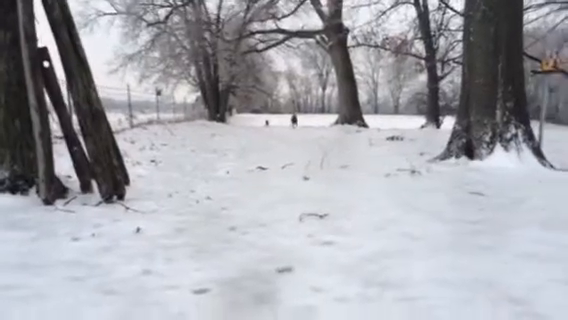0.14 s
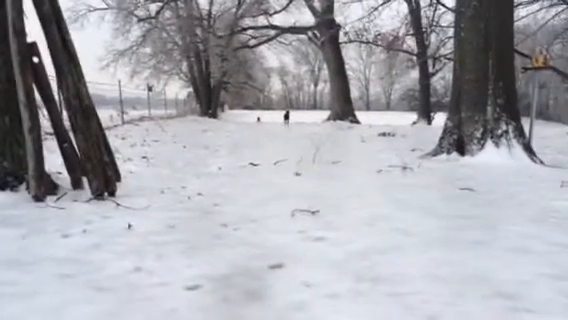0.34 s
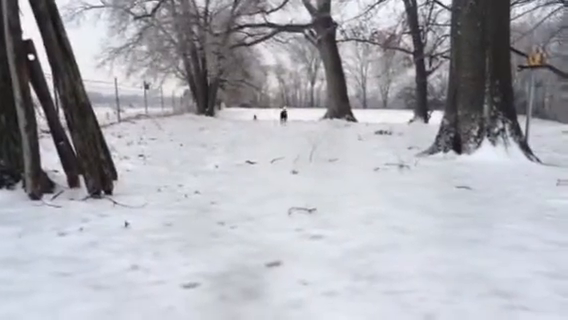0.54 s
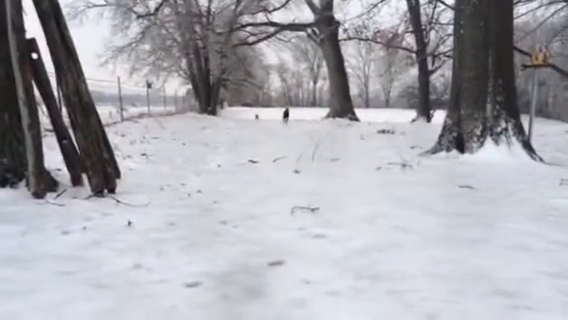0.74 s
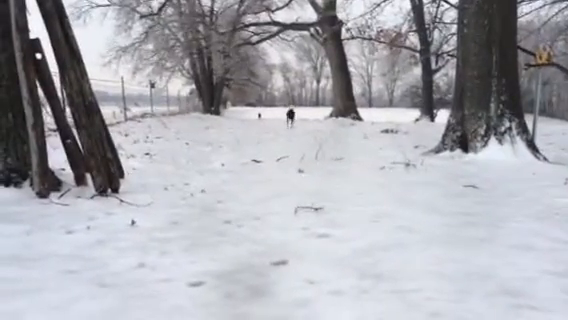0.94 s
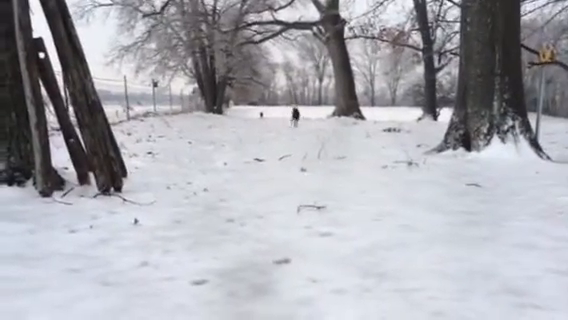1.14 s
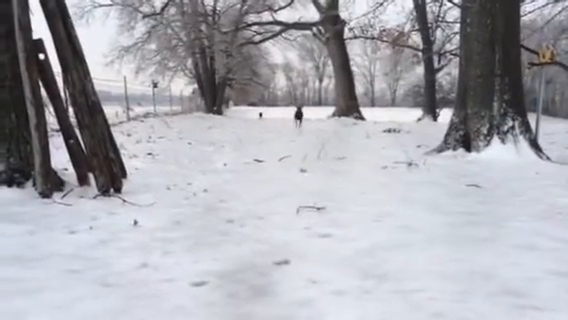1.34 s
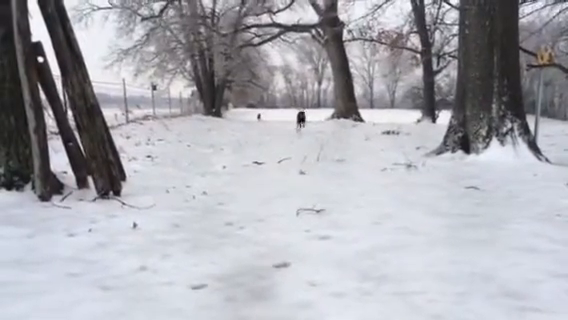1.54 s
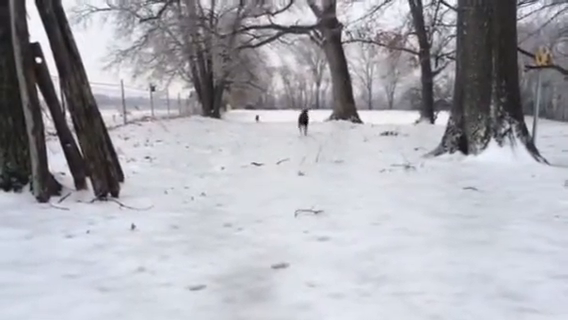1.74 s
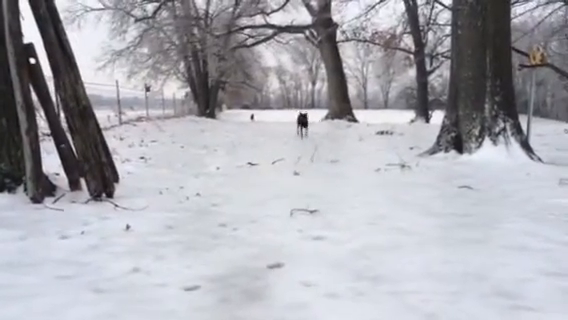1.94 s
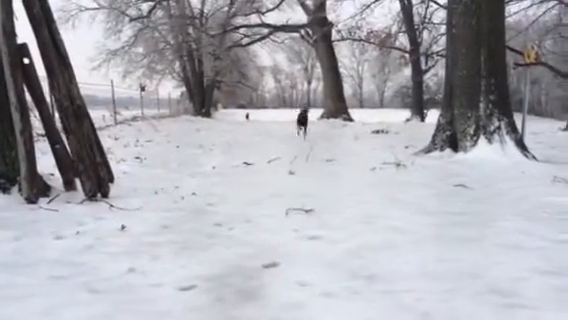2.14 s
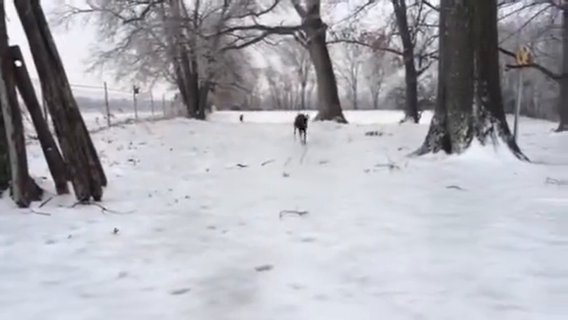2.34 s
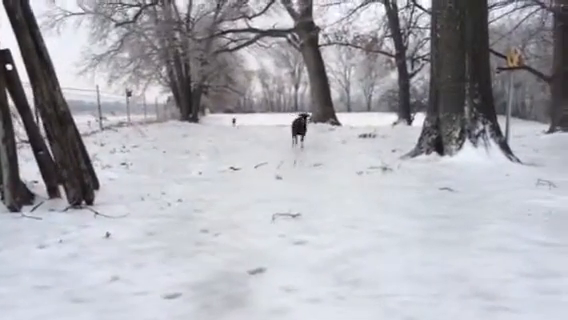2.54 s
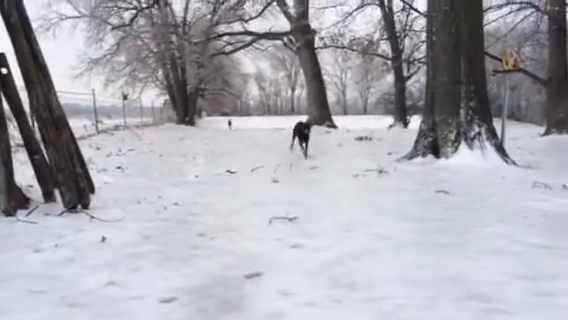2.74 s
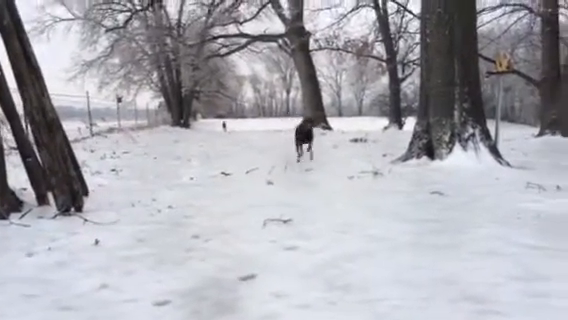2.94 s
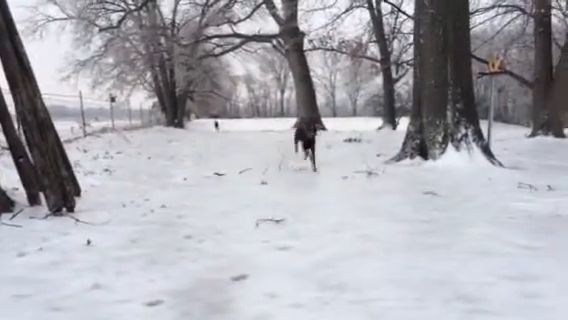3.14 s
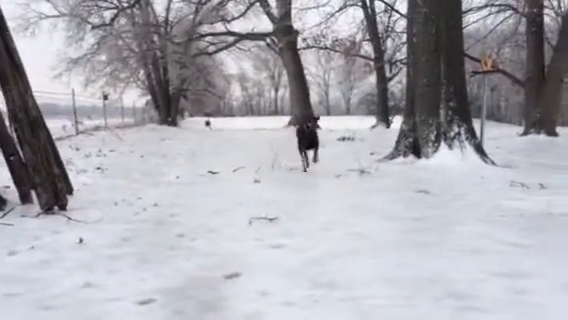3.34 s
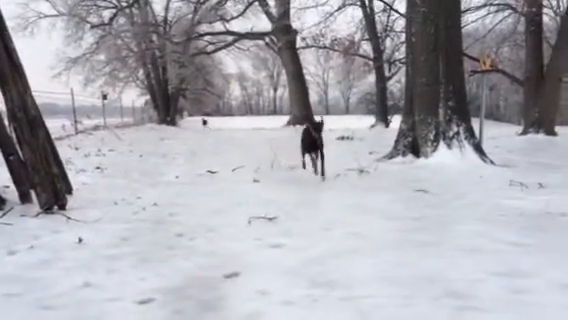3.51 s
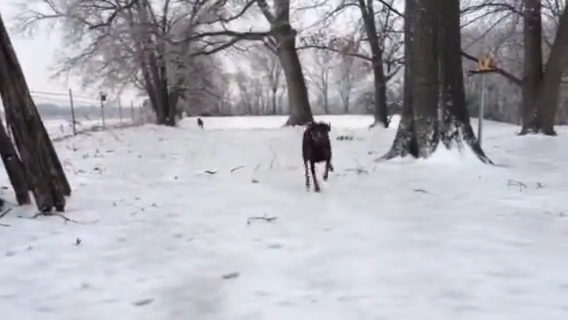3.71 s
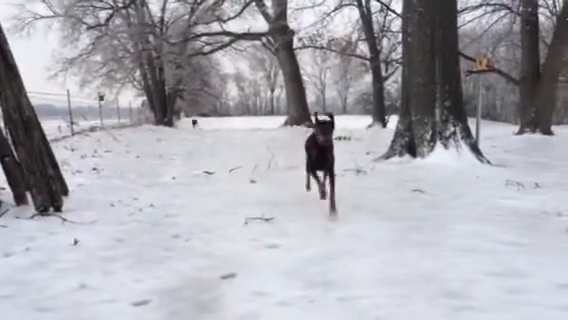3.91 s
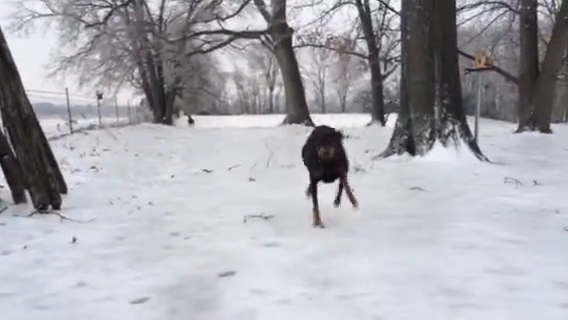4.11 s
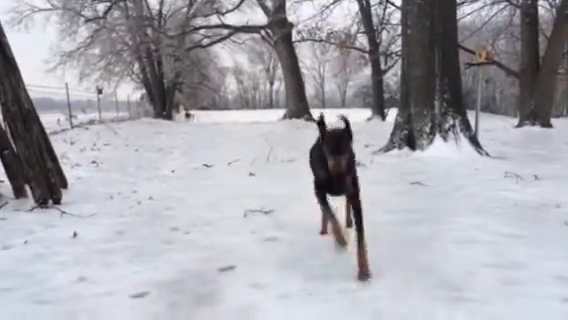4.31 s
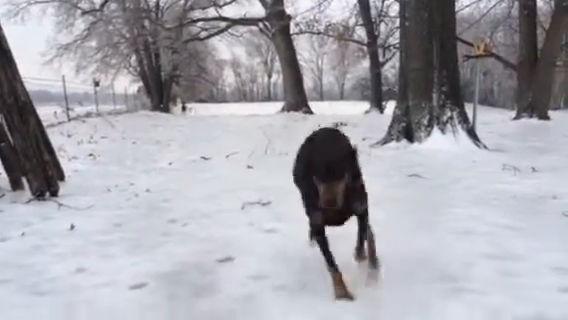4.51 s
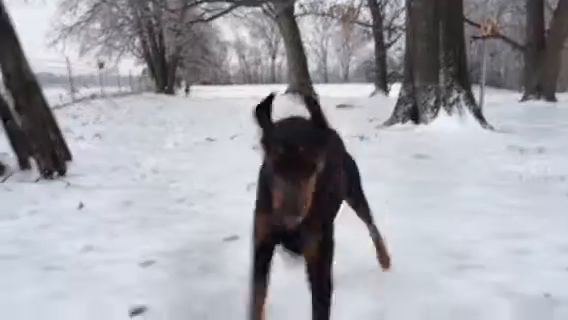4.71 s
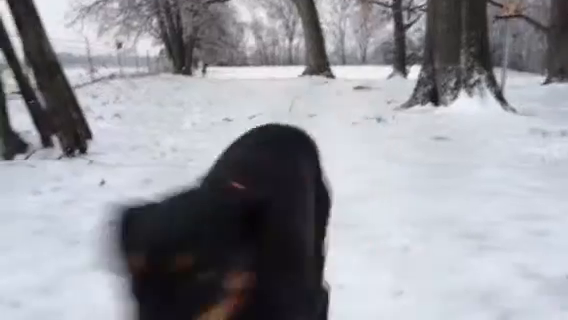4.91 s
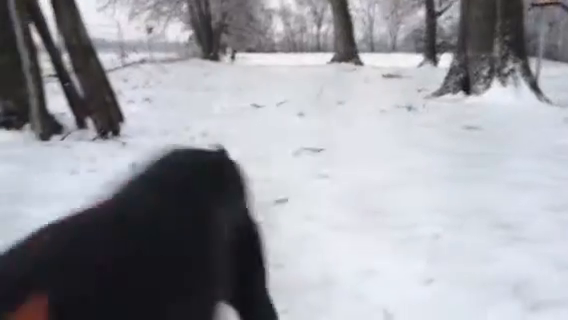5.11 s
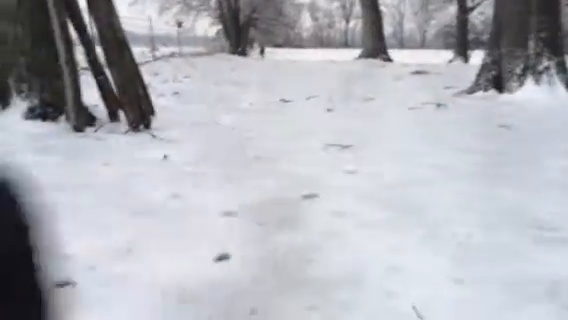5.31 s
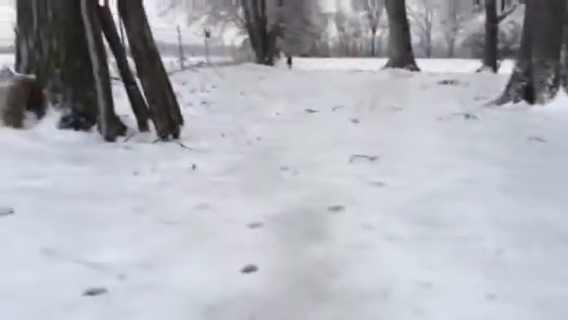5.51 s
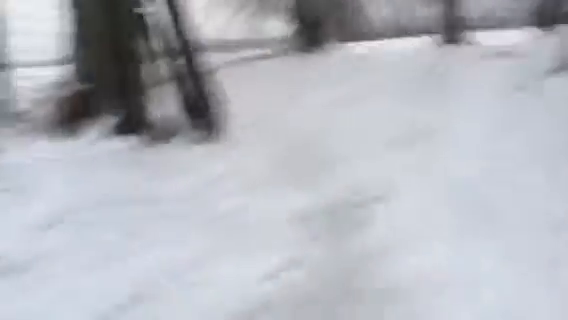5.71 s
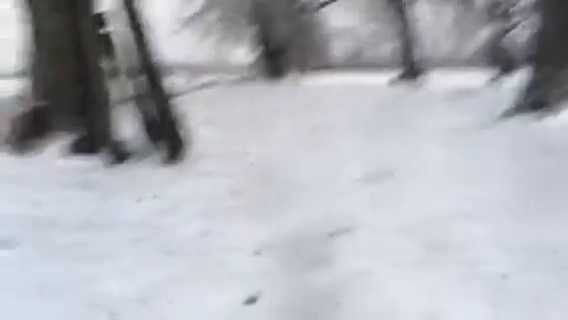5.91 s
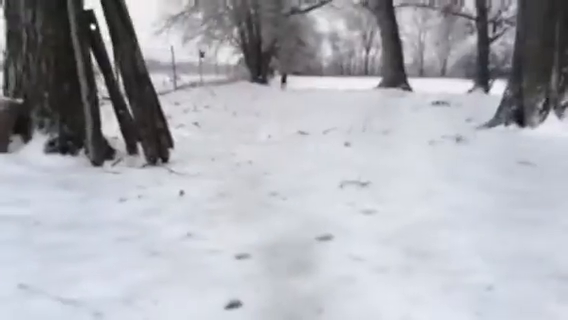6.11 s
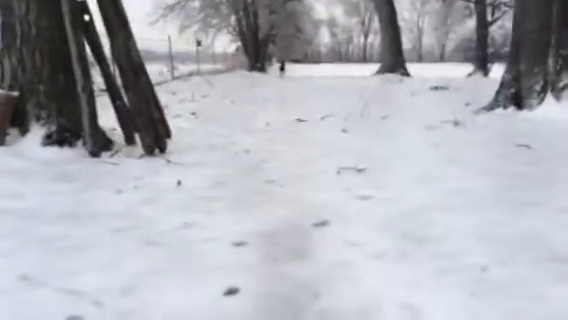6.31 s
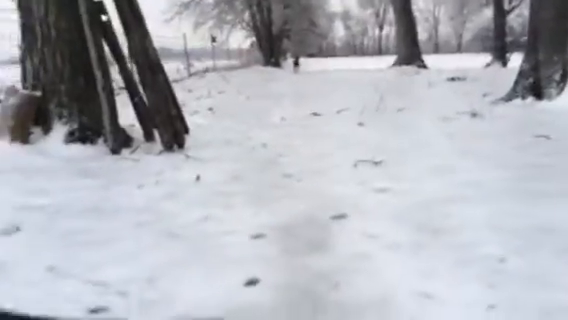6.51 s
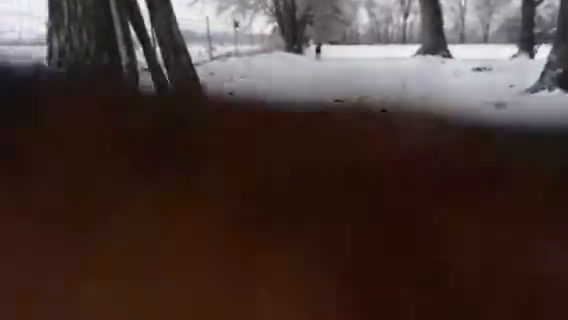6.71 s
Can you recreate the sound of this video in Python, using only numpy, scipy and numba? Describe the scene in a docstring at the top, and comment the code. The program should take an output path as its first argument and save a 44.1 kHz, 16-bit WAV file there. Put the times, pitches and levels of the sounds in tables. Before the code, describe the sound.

Quick paired paw falls start far away and faint over a soft hush, each a grainy crunch of snow crust. They approach, gaining glassy snaps and soft thuds, and peak sharply as the dog passes very near the microphone. Scrambling skids and scattering ice crumbs follow, thinning out before a close airy dog huff and a last few scuffs. Open, nearly dry woodland with faint short reflections from trunks.

```python
"""A dog gallops towards a phone over ice-crusted snow between trees, passes close, skids about and huffs.
Each paw crushes the crust into a spray of band-ringing grains, thumps the packed snow (sagging sines
over rough noise) and snaps single ice plates (noise tick and damped sine); crumbs trickle and skids scrape.
Light wind and the nearest steps push low noise puffs onto the microphone over a faint breeze and a faint
winter hush of steady noise."""
import sys
import numpy as np
from scipy import signal
from scipy.fft import rfft, irfft
from scipy.io import wavfile
from scipy.ndimage import uniform_filter1d
from numba import njit

SR = 44100
rng = np.random.default_rng(int(sys.argv[2]) if len(sys.argv) > 2 else 0)


def invert_db(level):
    """Linear amplitude ratio for a level in decibels (20 dB per decade), elementwise."""
    return 10 ** (np.asarray(level, dtype=float) / 20)


def store_pcm(level_fs):
    """Save levels as 16-bit WAV."""
    pcm = np.round(np.clip(level_fs, -1, 1) * 32767).astype(np.int16)
    wavfile.write(sys.argv[1], SR, np.atleast_2d(pcm).T)


N = 297918
T = np.arange(N) / SR

# paw falls, with a few short skids and grit bursts:
# (time [s], nominal crunch level [dB], crush level re crunch [dB], rise [s], fade [s])
CRUNCHES = [(0.0553, -45.5, -8.5, 0.0044, 0.019), (0.1112, -46.5, -8, 0.0051, 0.013),
            (0.2335, -44.5, -11, 0.0032, 0.036), (0.275, -43.5, -8, 0.0042, 0.007),
            (0.415, -50, -12, 0.0083, 0.019), (0.4656, -47, -5.5, 0.012, 0.023),
            (0.5912, -45, -13, 0.0031, 0.029), (0.643, -47.5, -3.5, 0.0043, 0.013),
            (0.7763, -46.5, -10, 0.0092, 0.013), (0.85, -46, -9, 0.007, 0.016),
            (0.974, -43.5, -13, 0.006, 0.015), (1.012, -48.5, -4.5, 0.0061, 0.023),
            (1.1678, -44, -9, 0.0068, 0.01), (1.226, -43, -8, 0.005, 0.02),
            (1.3284, -44, -6.5, 0.0028, 0.019), (1.377, -40, -5.5, 0.014, 0.007),
            (1.522, -45, -8, 0.006, 0.012), (1.5892, -40, -4, 0.0095, 0.013),
            (1.7092, -37, -6.5, 0.0071, 0.015), (1.762, -36.5, -16, 0.0052, 0.017),
            (1.9025, -37.5, -13, 0.0098, 0.015), (1.98, -43, -13, 0.0059, 0.035),
            (2.084, -41, -15, 0.0035, 0.023), (2.1411, -47, -4.5, 0.0073, 0.021),
            (2.18, -45.5, -6.5, 0.014, 0.02), (2.289, -35, -17, 0.0057, 0.0081),
            (2.3538, -38.5, -4.5, 0.022, 0.0065), (2.4792, -38, -9, 0.0029, 0.022),
            (2.5409, -37.5, -5.5, 0.0031, 0.0071), (2.572, -37.5, -11.5, 0.013, 0.0084),
            (2.6828, -42, -3.5, 0.0039, 0.0056), (2.697, -41.5, -13, 0.017, 0.013),
            (2.7426, -38, -20, 0.0071, 0.018), (2.866, -33, -7.5, 0.011, 0.0082),
            (2.9317, -36.5, -15, 0.0035, 0.025), (3.078, -37.5, -10.5, 0.0053, 0.032),
            (3.141, -37.5, -8.5, 0.0069, 0.015), (3.285, -33.5, -3, 0.0042, 0.0089),
            (3.3468, -34.5, -5, 0.0083, 0.015), (3.4916, -37.5, -2, 0.0048, 0.012),
            (3.5663, -32, -6.5, 0.0064, 0.013), (3.6961, -32.5, -7, 0.0028, 0.024),
            (3.738, -32, -13.0, 0.0073, 0.028), (3.8904, -30, -12, 0.011, 0.012),
            (3.9647, -29, -6, 0.0064, 0.017), (4.0129, -53, 3, 0.004, 0.0083),
            (4.083, -26.5, -6, 0.0033, 0.019), (4.138, -24, -9, 0.006, 0.02),
            (4.2024, -54, -8, 0.022, 0.035), (4.322, -25, -6, 0.014, 0.015),
            (4.3663, -25, -15, 0.012, 0.016), (4.406, -24.5, -5.5, 0.0052, 0.0037),
            (4.4309, -49, -8.0, 0.008, 0.0046), (4.471, -18.5, -11, 0.0032, 0.009),
            (4.498, -32, -3.5, 0.017, 0.0057), (4.535, -23, -11, 0.0019, 0.0065),
            (4.598, -42, -9, 0.021, 0.089), (4.684, -22.5, -11, 0.017, 0.018),
            (4.738, -23, -19, 0.0086, 0.013), (4.7811, -30, -6, 0.0075, 0.0081),
            (4.838, -29.5, -23, 0.0051, 0.007), (4.861, -25, -5, 0.0034, 0.027),
            (4.929, -24, 0, 0.0034, 0.032), (5.0191, -44, -12, 0.0094, 0.0048),
            (5.0814, -22.5, -4, 0.0087, 0.033), (5.1556, -36, 5.5, 0.0098, 0.0036),
            (5.1794, -27, -1, 0.015, 0.0073), (5.2234, -21, -1, 0.0067, 0.018),
            (5.262, -35.5, -9, 0.034, 0.03), (5.295, -29, -3, 0.012, 0.03),
            (5.449, -29, -11.0, 0.0029, 0.0094), (5.4726, -39, -5, 0.007, 0.015),
            (5.509, -35.5, -10, 0.011, 0.011), (5.526, -28, 4.5, 0.017, 0.01),
            (5.5595, -29, 4.5, 0.0043, 0.0031), (5.578, -33.5, -1.5, 0.022, 0.023),
            (5.674, -24.5, 0.5, 0.01, 0.014), (5.702, -37, -6, 0.013, 0.013),
            (5.755, -39, -5, 0.022, 0.0064), (5.7993, -35, -16, 0.023, 0.012),
            (5.8396, -32, -6, 0.02, 0.0042), (5.8746, -39, -7, 0.01, 0.01),
            (5.9326, -20.5, -9, 0.0059, 0.0029), (5.9787, -37.5, 2, 0.0049, 0.011),
            (5.9954, -37.5, -22, 0.012, 0.032), (6.0457, -29, -0.5, 0.015, 0.0078),
            (6.0951, -41, -8, 0.015, 0.01), (6.4607, -33, -3, 0.047, 0.021)]
# spectrum of breaking crust and ice crumbs: (frequency [Hz], density [dB per Hz])
CRUST_SPECTRUM = [(880, -15), (1500, -11.5), (2560, -6.5), (4160, -6), (6240, -1.5), (7390, -1.5),
                  (9100, -4.5), (14600, -2.5), (15500, -27), (16000, -25)]


def unit(x):
    """Scale to rms 1."""
    return x / np.sqrt(np.mean(x ** 2))


def colour(x, points):
    """Filter by (Hz, dB) points with a minimum-phase response made from the folded cepstrum; rms 1."""
    hz, db = np.transpose(points)
    grid_hz = np.maximum(np.arange(2049) * SR / 4096, 1)
    gain_db = np.interp(np.log(grid_hz), np.log(hz), db, left=db[0] - 38.0, right=db[-1] - 15)
    cepstrum = irfft(gain_db * np.log(10) / 20)
    cepstrum[1:2048] *= 2
    cepstrum[2049:] = 0
    impulse = irfft(np.exp(rfft(cepstrum)))
    return unit(signal.fftconvolve(x, impulse)[:N])


def curve(table):
    """Interpolate the columns of a (s, value, ..) table at every sample."""
    s, *columns = np.transpose(table)
    return [np.interp(T, s, column) for column in columns]


def swells(table):
    """Bell-shaped gains, one per level column, from (s, dB, .., length s) rows."""
    gains = 0
    for s, *db, length_s in table:
        bell = np.exp(-((T - s) / (.5 * length_s)) ** 2)  # length between the 1/e points
        gains = gains + np.outer(invert_db(np.array(db)), bell)
    return gains


def walk(rate_hz):
    """Random levels joined by ramps of 1 / rate_hz; rms 1."""
    hold = int(SR / rate_hz)
    steps = np.repeat(rng.standard_normal(N // hold + 1), hold)
    return unit(uniform_filter1d(steps, hold)[:N])


@njit
def svf(x, hz, width_hz):
    """State-variable band-pass with a moving centre, gain 1 there."""
    y, band, low = np.empty(len(x)), 0., 0.
    for i in range(len(x)):
        g = np.tan(np.pi * hz[i] / SR)
        k = width_hz / hz[i]
        v = (band + g * (x[i] - low)) / (1 + g * (g + k))
        band = 2 * v - band
        low = low + 2 * g * v
        y[i] = k * v
    return y


def grains(rate_hz, spread_db, bed, flicker_db=2.0):
    """Breaking crystals of very uneven size over fine noise; each band rings and flickers on its own."""
    out = 0
    for hz in 150 * 2 ** np.arange(0, 6.8, .75):
        size_db = spread_db * np.minimum(rng.exponential(size=N), 3.5)
        hits = rng.random(N) < rate_hz / SR
        clicks = hits * rng.standard_normal(N) * invert_db(size_db)
        drive = unit(clicks) + bed * rng.standard_normal(N)
        band = svf(drive, np.full(N, hz), 0.65 * hz)
        out = out + invert_db(flicker_db * walk(50)) * band
    return out


def add(out, s, sound):
    """Mix a sound in at time s."""
    i = max(int(s * SR), 0)
    out[i:i + len(sound)] += sound[:N - i]


def hush():
    """Faint winter hush: steady coloured noise."""
    # (frequency [Hz], density [dB per Hz])
    spectrum = [(59, -31), (100, -9), (200, -10), (433, -15), (4110, -17.5), (6150, -20), (14700, -25),
                (16000, -35)]
    return invert_db(-66) * colour(rng.standard_normal(N), spectrum)


def wind():
    """Wind and the nearest steps push low, uneven puffs onto the microphone over a faint breeze."""
    # puffs from wind and the nearest steps: (mid time [s], nominal level [dB], length [s])
    puffs = [(.05, -56, 0.19), (.32, -48.5, 0.11), (.63, -47.5, 0.16), (1.02, -59, .08),
             (1.57, -42.5, 0.11), (2.36, -57, .15), (2.52, -55, 0.068), (2.95, -48, 0.077),
             (3.64, -38.5, 0.17), (4.1, -44, 0.063), (4.34, -51, 0.071), (4.51, -43, .15),
             (4.87, -27.5, 0.065), (5.1, -45, 0.092), (5.27, -46, 0.16), (5.62, -41, 0.22),
             (6.06, -41, 0.09)]
    # (frequency [Hz], density [dB per Hz])
    spectrum = [(20, -18), (35, -13), (58, -6.5), (90, -12.5), (160, -23.5), (300, -42)]
    breeze_db = -63
    flutter_db = 1.5 * walk(25)
    gain = invert_db(breeze_db) + swells(puffs)[0]
    return colour(rng.standard_normal(N), spectrum) * invert_db(flutter_db) * gain


def trickle():
    """Scattered ice crumbs skitter on; paws and body scrape the snow, swelling in the skids."""
    # loose ice around the dog: (time [s], nominal crumb level [dB], nominal low scrape level [dB])
    loose_ice = [(0, -70, -68.5), (.9, -65, -69.5), (1.2, -60, -62.5), (2.2, -60, -63.5), (2.8, -56.5, -65),
                 (3.1, -60.5, -64.5), (4.05, -60.5, -65.5), (4.45, -54, -56), (4.65, -43.5, -50.5),
                 (5.36, -61, -58), (5.41, -56.5, -60), (5.9, -49, -54.5), (6.1, -53.5, -50),
                 (6.76, -53, -55.5)]
    # skids that plough the snow: (mid time [s], nominal crumb level [dB], nominal scrape level [dB], length [s])
    skids = [(4.4, -50, -41, 0.048), (4.57, -38.5, -49, 0.086), (4.77, -40, -45.5, .1),
             (4.9, -37.5, -45, 0.078), (5.02, -46, -48, 0.2), (5.19, -42, -37, 0.067),
             (5.28, -32.5, -36.5, 0.11), (5.36, -39.5, -40.5, 0.075), (5.6, -42.5, -36.5, .16),
             (5.72, -38.5, -38.5, 0.088), (5.85, -39.5, -42, 0.067), (6.07, -43.5, -44.5, 0.083),
             (6.2, -47.5, -53, 0.1), (6.37, -56, -48.5, .2), (6.52, -44, -47, 0.064)]
    # (frequency [Hz], density [dB per Hz])
    scrape_spectrum = [(100, -7), (180, 10), (400, -9), (1000, -7.5), (2000, -7.5), (3000, -23)]
    crumbs_gain, scrape_gain = invert_db(np.array(curve(loose_ice))) + swells(skids)
    crumbs = colour(grains(rate_hz=300., spread_db=4.5, bed=0.87), CRUST_SPECTRUM) * invert_db(2.2 * walk(40))
    scrape = colour(grains(rate_hz=240.0, spread_db=3., bed=0.89), scrape_spectrum) * invert_db(3.67 * walk(30))
    return crumbs_gain * crumbs + scrape_gain * scrape


def crunches():
    """The load on the snow swells and lets go; it drives bright crust grains and duller crushing below."""
    # (frequency [Hz], density [dB per Hz])
    crush_spectrum = [(250, -30.5), (400, 6), (800, -1), (1500, 0.5), (2500, -7.5), (4000, -12.5)]
    crust_load, crush_load, t = np.zeros(N), np.zeros(N), T[:SR // 3]
    for s, db, crush_db, rise_s, fade_s in CRUNCHES:
        swell = 0.096 + 0.62 * np.minimum(t / max(rise_s, .001), 1) ** 1.03
        release = np.exp(-(np.maximum(t - rise_s, 0) / max(fade_s, .002)) ** 1.04)
        load = swell * release
        add(crust_load, s, invert_db(db) * load)
        add(crush_load, s, invert_db(db + crush_db) * load)
    stutter = invert_db(2.14 * walk(160))  # the crust gives way in jerks
    crust_grains = grains(rate_hz=700., spread_db=2.5, bed=0.78, flicker_db=4.)
    crust = crust_load * invert_db(2.84 * walk(300)) * colour(crust_grains, CRUST_SPECTRUM)
    crush_grains = grains(rate_hz=400., spread_db=5.0, bed=0.67, flicker_db=4.)
    crush = crush_load * invert_db(1.36 * walk(120)) * colour(crush_grains, crush_spectrum)
    return stutter * (crust + crush)


def small_plates():
    """Every crunch breaks two small plates at chance moments within it: (s, nominal dB, ring Hz) rows."""
    over_crunch_db, scatter_db = 4, 2.5
    centre_hz, spread_octaves = 6400, 0.28
    crunch = np.repeat(np.array(CRUNCHES), 2, axis=0)
    when = rng.random(len(crunch))
    size, pitch = rng.standard_normal((len(crunch), 2)).T
    s = crunch[:, 0] + when * (crunch[:, 3] + 1.5 * crunch[:, 4])  # within rise + 1.5 fades
    db = crunch[:, 1] + over_crunch_db + scatter_db * size
    hz = centre_hz * 2 ** (spread_octaves * pitch)
    return list(zip(s, db, hz))


def snaps():
    """A plate breaks: a broad, splintery tick and a very short ring, shorter at higher pitch."""
    # loudest ice plates: (time [s], nominal level [dB], ring [Hz])
    large_plates = [(0.794, -26, 6500), (0.9772, -27.5, 6560), (1.3902, -27, 6660), (1.717, -32, 5430),
                    (1.9645, -29, 6300), (2.145, -27, 6700), (2.2965, -26, 6850), (2.3784, -26, 7500),
                    (2.6874, -25, 6460), (2.9658, -28, 7300), (3.2881, -19, 7700), (3.4974, -25.5, 6200),
                    (3.7017, -16, 6600), (3.7476, -13.5, 6200), (3.8975, -20, 7710), (3.9733, -20, 5200),
                    (4.0163, -23.5, 7150), (4.0853, -11.5, 6250), (4.12, -20, 1550), (4.16, -11, 5300),
                    (4.163, -13.5, 6900), (4.1744, -23, 1530), (4.3846, -12.5, 7540), (4.3917, -9, 6760),
                    (4.4057, -11, 5990), (4.4103, -14, 7300), (4.4209, -14.5, 7000), (4.4373, -20, 6200),
                    (4.479, -6, 6500), (4.4888, -6, 7260), (4.5005, -7, 7200), (4.514, -13, 3330),
                    (4.5385, -2.5, 6740), (4.6201, -16.5, 7800), (4.7028, -7, 7400), (4.7444, -6.5, 7670),
                    (4.7555, -1.5, 6400), (4.7856, -12, 7350), (4.8445, -14.5, 12600), (4.8682, -5.5, 7800),
                    (4.9338, -10, 8050), (5.0248, -17.5, 1650), (5.0888, -6.5, 10600), (5.182, -10, 12620),
                    (5.252, -11, 11100), (5.297, -14, 3600), (5.311, -15, 4200), (5.3736, -11.5, 9300),
                    (5.4546, -12, 6730), (5.4878, -24, 6800), (5.5162, -22.5, 2970), (5.5276, -15, 860),
                    (5.5638, -12.5, 4470), (5.585, -11.5, 9100), (5.6313, -24, 5170), (5.6386, -27, 2710),
                    (5.6828, -20, 1500), (5.7314, -17, 5000), (5.7759, -20, 5430), (5.8104, -16, 5400),
                    (5.8266, -14.5, 7000), (5.8926, -14.5, 7240), (5.9386, -7, 7840), (5.9709, -28.5, 2800),
                    (5.988, -15.5, 8200), (6.0166, -13, 10100), (6.0842, -22, 6420), (6.4988, -18, 2100),
                    (6.5112, -22.5, 4310), (6.682, -30.5, 3100)]
    out, t = np.zeros(N), T[:SR // 100]
    plates = list(large_plates) + small_plates()
    noises = rng.standard_normal((len(plates), len(t)))
    for (s, db, hz), noise in zip(plates, noises):
        ring = np.sin(2 * np.pi * hz * t) * np.exp(-t * np.sqrt(hz) / .03)
        tick = noise * (0.48 * np.exp(-t / 0.000098) + 0.19 * np.exp(-t / 0.0022))
        add(out, s, invert_db(db) * (1.23 * ring + tick))
    return out


def thumps():
    """Each landing rings the packed snow briefly, sagging in pitch, while the snow slumps roughly."""
    # (time near the peak [s], nominal level [dB], nominal pitch [Hz])
    landings = [(0.325, -47, 110), (.615, -39.5, 104), (0.654, -44, 158), (.86, -41, 139),
                (.976, -45.5, 150), (1.023, -34.5, 151), (1.17, -51.5, 177), (1.331, -38, 162),
                (1.384, -38, 159), (1.524, -36.5, 113), (1.713, -35, 160), (1.766, -40, 159),
                (1.909, -39, 140), (1.985, -41.5, 161), (2.094, -37, 165), (2.145, -36.5, 139),
                (2.292, -39.5, 161), (2.356, -38.5, 123), (2.491, -39, 164), (2.551, -36, 160),
                (2.708, -43.5, 158), (2.873, -36, 164), (2.935, -29.5, 101), (3.085, -42, 129),
                (3.156, -36, 205), (3.29, -36, 167), (3.361, -35, 118), (3.553, -37, 96), (3.575, -43, 113),
                (3.703, -32, 165), (3.744, -34.5, 380), (3.901, -40, 172), (3.973, -35, 177),
                (4.091, -18, 174), (4.145, -29, 200), (4.343, -23, 208), (4.372, -34, 161),
                (4.413, -31.5, 269), (4.475, -24.5, 188), (4.495, -21.5, 188), (4.518, -21, 151),
                (4.54, -18.5, 209), (4.579, -31, 158), (4.71, -25, 144), (4.747, -24, 253),
                (4.762, -26, 364), (4.79, -21.5, 183), (4.865, -13, 213), (4.897, -22, 96),
                (4.929, -21, 330), (4.949, -29.5, 165), (5.027, -31.5, 282), (5.092, -19.5, 185),
                (5.168, -22.5, 207), (5.188, -24, 191), (5.204, -20, 146), (5.237, -15, 134),
                (5.313, -13.5, 233), (5.336, -28, 124), (5.372, -29.5, 150), (5.542, -24, 155),
                (5.554, -20.5, 235), (5.571, -33, 199), (5.606, -26, 152), (5.692, -17, 249),
                (5.777, -34.5, 285), (5.841, -35, 330), (6.062, -29, 344), (6.166, -33.5, 153),
                (6.223, -38, 226), (6.482, -33, 170), (6.499, -22, 197), (6.531, -39, 255),
                (6.612, -41, 161)]
    # (frequency [Hz], density [dB per Hz])
    slump_spectrum = [(60, -24), (110, -0.5), (200, 3), (330, -5.5), (500, -12), (800, -21), (1500, -25)]
    out, load, t = np.zeros(N), np.zeros(N), T[:SR // 4]
    for (s, db, hz), (sign, over) in zip(landings, rng.random((len(landings), 2))):
        t60_s = np.clip(10 / hz, 0.045, 0.058)  # ten cycles to fall 60 dB, within limits
        attack = np.minimum(t / 0.0034, 1)
        decay = invert_db(db) * attack * 1000 ** (-np.maximum(t - .004, 0) / t60_s)
        phase = 2 * np.pi * hz * t * (1.03 - 1.7 * t)
        ring = np.sin(phase) + 0.25 * np.sin((1.418 + 0.79 * over) * phase)
        add(out, s - .005, 1.074 * np.sign(sign - .5) * decay * ring)
        add(load, s - .005, decay ** 0.71 * invert_db(0.31 * db))  # slower fall than the ring
    return out + 0.47 * load * colour(rng.standard_normal(N), slump_spectrum)


def huff():
    """Air rushes through the mouth: broad hiss, a narrow moving resonance and a duller one of the throat."""
    # (time [s], nominal level [dB], mouth resonance [Hz], resonance share [0-1])
    breaths = [(6.12, -44, 1400, .4), (6.18, -37, 1450, 0.57), (6.29, -34, 1300, 0.9),
               (6.37, -31.5, 1710, 0.62), (6.42, -32.5, 1820, 0.54), (6.46, -40, 1520, 0.16),
               (6.51, -39.5, 1290, 0.25), (6.58, -43, 1150, 0.8), (6.68, -47.5, 950, 0.6),
               (6.76, -38.5, 1080, .4)]
    # (frequency [Hz], density [dB per Hz])
    hiss_spectrum = [(120, -38), (200, -11), (748, -3), (1510, -2.5), (2460, -11), (5260, -12.5),
                     (15000, -42)]
    db, hz, share = curve(breaths)
    fade = np.clip((T - breaths[0][0]) / 0.039, 0, 1)
    airy = unit(svf(rng.standard_normal(N), hz, 105.0))
    whistle = np.sin(2 * np.pi * np.cumsum(hz + 60 * walk(150)) / SR)  # wavering edge tone at the resonance
    mouth = .95 * airy + .9 * whistle * share
    throat = invert_db(-8.5 + 3.5 * walk(25)) * unit(svf(rng.standard_normal(N), 0.31 * hz, 290.0))
    hiss = colour(rng.standard_normal(N), hiss_spectrum)
    return fade * invert_db(db + 0.87 * walk(60)) * (share * mouth + throat + 0.71 * hiss)


def dull(dog):
    """Air and turning away dull the dog's top treble by a varying share."""
    # (time [s], share lost [0-1])
    dulling = [(0, 0.78), (3.5, 0.16), (4.75, 0.35), (4.9, 0), (5.4, 0.4), (6.76, 0.28)]
    sheen = signal.filtfilt(*signal.butter(2, 9500, "high", fs=SR), dog)
    return dog - np.clip(curve(dulling)[0], 0, 1) * sheen


def trunk_scatter(dog):
    """The trunks scatter the sound back as decaying noise: 4 ms gap, 0.2 s to fall 60 dB."""
    t = T[:SR // 4]
    trunks = rng.standard_normal(len(t)) * 1000 ** (-t / .2) * (t > .004)
    trunks = trunks / np.sqrt(np.sum(trunks ** 2))
    return invert_db(-16.5) * signal.fftconvolve(dog, trunks)[:N]


def scene():
    """The dog, a short scatter from the trunks, wind and hush."""
    dog = dull(crunches() + thumps() + snaps() + trickle() + huff())
    return (dog + trunk_scatter(dog) + wind() + hush())[None]


def top_cut(x):
    """Nothing passes above the cut-off."""
    return signal.sosfilt(signal.butter(12, 16610, fs=SR, output="sos"), x)


def record(dry):
    """The phone cuts the deepest bass, rounds the sharpest peaks and cuts the top."""
    x = signal.sosfilt(signal.butter(2, 55, "high", fs=SR, output="sos"), dry)
    x = .75 * np.tanh(x / .75)
    x = signal.sosfilt(signal.ellip(10, .2, 50, 15350, fs=SR, output="sos"), x)
    return top_cut(x)


dry = scene()
out = record(dry)
store_pcm(out)
```